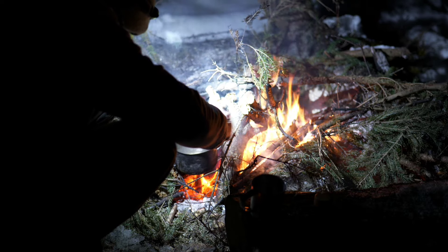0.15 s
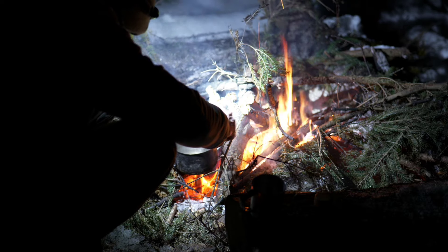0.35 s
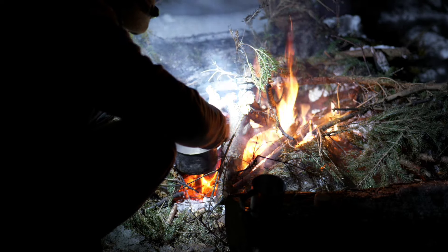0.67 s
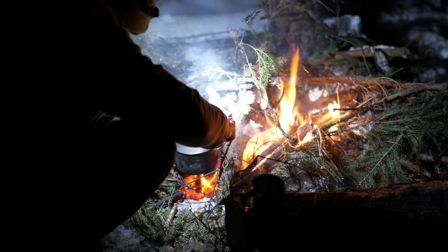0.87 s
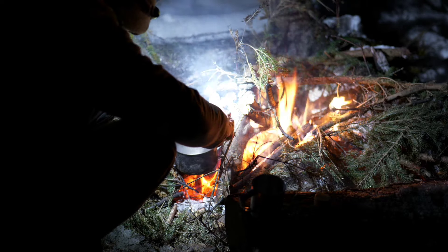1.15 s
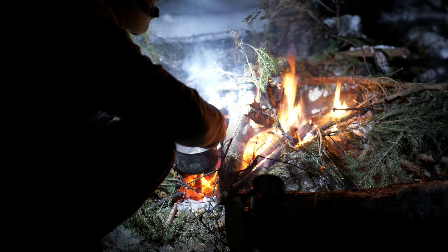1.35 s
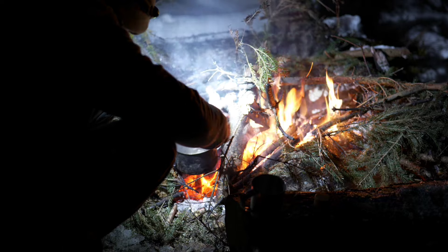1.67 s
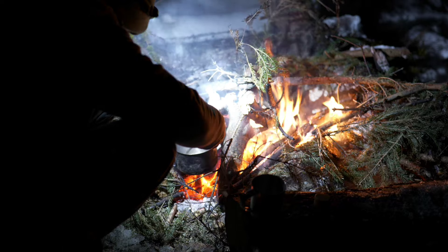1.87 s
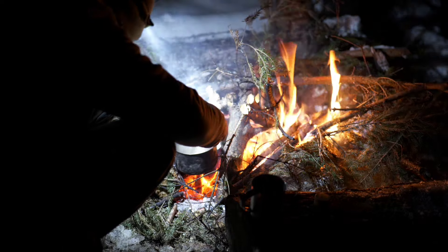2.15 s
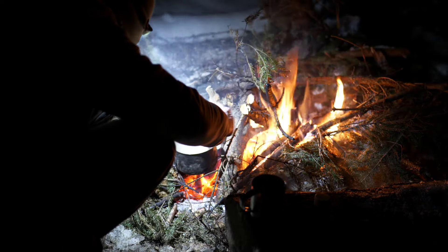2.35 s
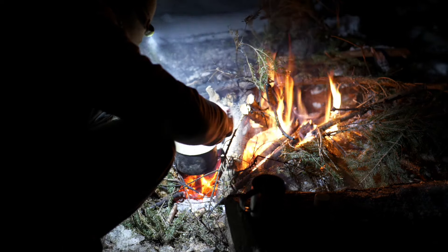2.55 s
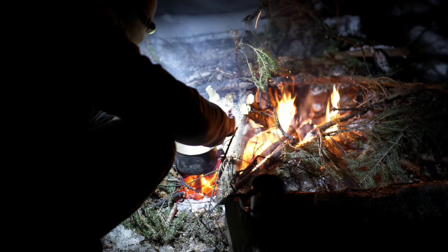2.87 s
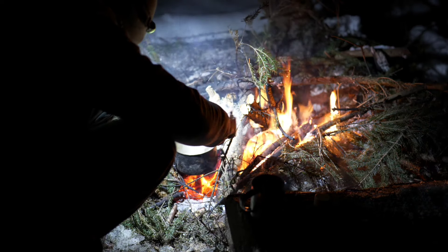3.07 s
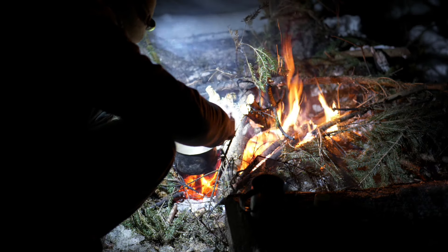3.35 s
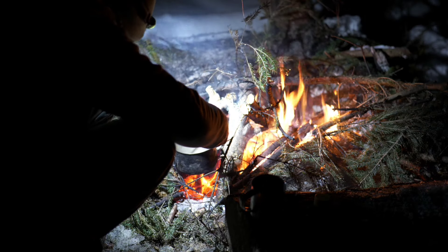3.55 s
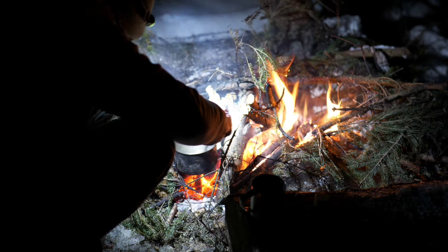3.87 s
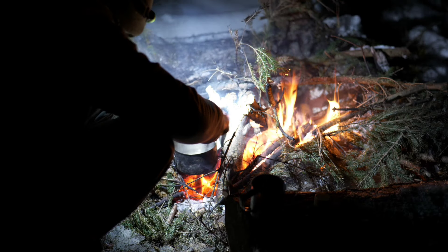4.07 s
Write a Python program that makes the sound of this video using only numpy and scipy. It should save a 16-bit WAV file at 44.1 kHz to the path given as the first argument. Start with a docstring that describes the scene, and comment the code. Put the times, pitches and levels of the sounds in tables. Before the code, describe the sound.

A small campfire of damp conifer branches, heard close on a still snowy night. Sharp snaps and tiny ticks come irregularly over soft steam hiss and a low, quiet flame flutter. Moist wood adds short bubbling plips. Pops are sparse at first, then crowd together after three seconds, where one crack stands far above the others. The space is nearly dry, with only a faint dull tail and slight microphone hiss.

```python
"""Wood pops and ticks in a small, close campfire of damp conifer branches on a still night in the snow.
Pops are filtered pressure spikes with splinters and a ground bounce; ticks are random resonated clicks.
Moisture bubbles out of the boughs in short plips: gliding, fading sines with a spatter of noise.
Steam hisses softly as coloured noise and narrow jets over the low flutter of the flames, also noise.
A faint dull tail follows pops, plips and ticks; faint steady microphone hiss lies beneath."""
import sys
import numpy as np
from scipy import signal
from scipy.fft import rfft, irfft
from scipy.io import wavfile

SR = 44100
rng = np.random.default_rng(int(sys.argv[2]) if len(sys.argv) > 2 else 0)


def waveform_to_disk(signal):
    """Save audio, clipped to [-1, 1], as 16-bit WAV at the path in sys.argv[1]."""
    frames = np.transpose(np.atleast_2d(signal))
    scaled = np.clip(frames, -1, 1) * 32767
    samples = np.round(scaled).astype(np.int16)
    wavfile.write(sys.argv[1], SR, samples)


N = 185728

# Spectrum of the flames. Each row: frequency in Hz, relative density in dB per Hz.
FLAME_SPECTRUM = [(12, -21), (20, 2.5), (33, -4.5), (102, -2), (178, -4), (202, -5.5), (251, -11.5),
                  (301, -15.5), (380, -13.5), (653, -17.5), (702, -15), (797, -10.5), (1100, -13.5),
                  (1370, -16), (1500, -14), (1950, -53), (3300, -120)]


def from_db(db):
    """Decibels to gain."""
    return 10 ** (np.asarray(db) / 20)


def rms_one(x):
    """Scale to an rms of 1."""
    return x / np.sqrt(np.mean(x ** 2) + 1e-20)


def at_hz(points, hz):
    """Read a spectrum on a log-frequency axis."""
    f, value = np.transpose(points)
    return np.interp(np.log(hz + 1e-3), np.log(f), value)


def cut(x, hz, kind, order=2):
    """Butterworth low- or high-pass."""
    sos = signal.butter(order, min(hz, SR / 2 - 1000), kind, fs=SR, output="sos")
    return signal.sosfilt(sos, x)


def resonate(x, hz, width_hz):
    """Two-pole resonance with a gain of 1 on top."""
    r = np.exp(-np.pi * width_hz / SR)
    zeros = np.array([1, 0, -1]) * (1 - r * r) / 2
    poles = [1, -2 * r * np.cos(2 * np.pi * hz / SR), r * r]
    return signal.lfilter(zeros, poles, x + 1e-18)


def drift(rate_hz):
    """Slow random drift with an rms of 1: white noise weakened above rate_hz."""
    hz = np.fft.rfftfreq(N, 1 / SR)
    white = rfft(rng.standard_normal(N))
    return rms_one(irfft(white / (1 + (hz / rate_hz) ** 2), N))


def noise(spectrum):
    """Coloured noise of rms 1."""
    hz = np.fft.rfftfreq(N, 1 / SR)
    white = rfft(rng.standard_normal(N))
    return rms_one(irfft(white * from_db(at_hz(spectrum, hz)), N))


def add(track, s, sound):
    """Mix a short sound into a track at time s."""
    i = max(0, int(round(s * SR)))
    part = sound[..., :max(0, N - i)]
    track[..., i:i + part.shape[-1]] += part


def stereo(mid, side):
    """Left and right from mid and side."""
    return np.array([mid + side, mid - side])


def scatter(t, fade_s):
    """A dying cloud of tiny reflections with unit energy."""
    onset = 1 - np.exp(-t / 0.00022)
    cloud = rng.standard_normal(len(t)) * np.exp(-t / fade_s) * onset
    return cloud / np.sqrt(np.sum(cloud ** 2))


def pop_spike(click, peak_db, sharp_hz, twig_hz):
    """A bursting pocket's pressure spike: dull if big, with a fibre snap, coloured by twig and pile."""
    # Peaks and dips from the pile of sticks. Each row: frequency in Hz, width in Hz, gain in dB.
    pile_peaks = [(180, 67, 4), (292, 113, -21), (409, 50, 3.5), (1100, 200, -0.5), (1540, 990, -4),
                  (3740, 350, -7), (4800, 370, 4.5), (6500, 6800, -8)]
    snap_db, twig_q = -19, 2.0
    bass_edge_hz, bass_share = 175, 0.082   # the sharper the pop, the higher its bass ends
    # twigs of middling size ring most
    twig_best_db, twig_best_hz, twig_db_per_octave = 8, 3320, 5.5
    twig_db = twig_best_db - twig_db_per_octave * abs(np.log2(twig_hz / twig_best_hz))

    snap = from_db(snap_db) * sharp_hz / 6000 * resonate(click, 9100, 2200)
    spike = cut(click, sharp_hz, "low") + snap
    spike = cut(spike, bass_edge_hz + bass_share * sharp_hz, "high", order=1)
    for hz, width_hz, db in [(twig_hz, twig_hz / twig_q, twig_db), *pile_peaks]:
        spike = spike + (from_db(db) - 1) * resonate(spike, hz, width_hz)
    return -from_db(peak_db) * spike / np.abs(spike).max()


def ground_bounce(click, sharp_hz):
    """A delayed, duller copy off the ground, weaker for sharper pops."""
    delay_s, strongest_db, weakest_db = 0.001353, -2, -26
    db_per_octave, knee_hz = 25, 2260   # weakens as sharpness rises above the knee
    db = strongest_db - db_per_octave * np.log2(sharp_hz / knee_hz)
    gain = from_db(np.clip(db, weakest_db, strongest_db))
    return gain * cut(np.roll(click, int(delay_s * SR)), 8400, "low")


def pops():
    """Steam pockets burst: each spike is convolved with itself direct, its bounce and its splinters."""
    # Bursts in the wood. Each row: start in seconds, spike peak in dB, sharpness in Hz,
    # twig resonance in Hz, splintering in dB relative to the spike.
    bursts = [ (0.088, -41, 6500, 4600, 3), (0.1379, -28, 3670, 720, -27), (0.6479, -20, 10100, 3400, -8),
              (1.0526, -15.5, 5700, 3740, -8), (1.3994, -38, 880, 400, -21),
              (1.4055, -26, 2920, 2140, -6.5), (1.4227, -37, 3800, 3400, -9),
              (1.8499, -36.5, 11000, 4800, -20), (2.0776, -14.5, 13800, 11500, -10.5),
              (2.1344, -33, 11000, 3960, -16), (2.5089, -28.5, 2870, 750, -11),
              (2.6486, -34, 11500, 4400, -5), (2.7770, -11.5, 12600, 3600, -10),
              (2.901, -28, 11500, 3970, -5), (3.0951, -22.5, 13100, 3300, -2),
              (3.1101, -19, 12400, 3670, 3), (3.2447, -24.5, 14100, 9000, -2.5),
              (3.2666, -3.5, 4840, 1900, -8.5), (3.3516, -21, 2400, 4340, -5.5),
              (3.5010, -21.5, 11800, 8800, -4), (3.5107, -29.5, 12800, 10000, -5),
              (3.6445, -36.5, 4530, 3000, -3), (3.7441, -27.5, 13300, 3200, 2),
              (3.81, -26.5, 10000, 4800, -11), (3.8331, -20, 7850, 3140, -5.5), ]
    splinter_s, splinter_low_hz, side_db = 0.0021, 600, -20
    out, t = np.zeros((2, N)), np.arange(SR // 40) / SR
    click = 1.0 * (t == 0)
    for s, peak_db, sharp_hz, twig_hz, splinter_db in bursts:
        spike = pop_spike(click, peak_db, sharp_hz, twig_hz)
        splinters = from_db(splinter_db) * cut(scatter(t, splinter_s), splinter_low_hz, "high")
        mid = click + ground_bounce(click, sharp_hz) + splinters
        side = from_db(side_db) * cut(scatter(t, splinter_s), 13500, "high", order=1)
        add(out, s, signal.fftconvolve(stereo(mid, side), spike[None], axes=1))
    return out


def sizzle():
    """Needles and bark tick at random, most of them barely above the steam."""
    ticks_per_s, least_db, spread_db = 60, -53, 2.2   # click levels ahead of the resonances
    sizes = from_db(least_db + spread_db * np.minimum(rng.exponential(1, N), 3))
    clicks = sizes * (rng.random(N) < ticks_per_s / SR)
    woody_ticks = 2 * resonate(clicks, 2700, 1450)
    thin_snaps = resonate(clicks, 11000, 5000)
    t = np.arange(SR // 100) / SR
    smear = (t == 0) + scatter(t, 0.0022)
    return signal.fftconvolve(woody_ticks + thin_snaps, smear)[:N]


def bubble(tone_db, hz, fade_s, glide):
    """A bubble swells, rings while its pitch slides, spatters as it opens and stirs the hollows."""
    # Hollows between the logs. Each row: frequency in Hz, width in Hz, gain in dB.
    hollow_modes = [(750, 70, -13.5), (1920, 160, -15.5)]
    swell_share, longest_swell_s = 0.43, 0.0029   # share of the fade time, up to a limit
    # spatter and gurgle grow more slowly than the tone; their levels hold at middling_db
    middling_db, burst_follows = -37, 0.47
    spatter_db, spatter_width_hz, spatter_top_hz = -55.5, 920, 3400   # rms ahead of the envelope
    gurgle_db, gurgle_fade_s = -49.5, 0.025   # ahead of each hollow's gain

    t = np.arange(SR // 8) / SR
    swell_s = min(swell_share * fade_s, longest_swell_s)
    swell = np.sin(np.pi / 2 * np.minimum(t / swell_s, 1)) ** 2
    envelope = swell * np.exp(-np.maximum(t - swell_s, 0) / fade_s)
    pitch_hz = hz * 2 ** np.clip(glide * t, -1, 1)
    tone = from_db(tone_db) * np.sin(2 * np.pi * np.cumsum(pitch_hz) / SR)

    burst = from_db(burst_follows * (tone_db - middling_db))
    white = rng.standard_normal(len(t))
    spatter = resonate(white, min(1.34 * hz, 4200), spatter_width_hz)
    spatter = from_db(spatter_db) * rms_one(cut(spatter, spatter_top_hz, "low"))
    gurgle = sum(from_db(gurgle_db + db) * rms_one(resonate(white, f, width_hz))
                 for f, width_hz, db in hollow_modes)
    gurgle_envelope = swell * np.exp(-t / gurgle_fade_s)
    return envelope * (tone + burst * spatter) + gurgle_envelope * burst * gurgle


def bubbling():
    """Clear plips of the wet boughs among faint random ones, most of them low and rising."""
    # Bubbles. Each row: start in seconds, tone level in dB ahead of its envelope, starting pitch in Hz,
    # fade time in seconds, glide in octaves per second.
    clear_plips = [ (0.350, -51, 1920, 0.0042, -5), (0.463, -46, 1130, 0.0034, 12),
                   (0.464, -51, 1950, .0033, 8), (0.592, -40.5, 1100, 0.0027, 13),
                   (0.600, -48, 1250, .005, 42), (0.851, -52, 990, 0.0044, 2), (0.912, -52, 745, .0057, 11),
                   (1.1465, -38.5, 1280, 0.0012, 10), (1.148, -51, 778, 0.031, -1),
                   (1.154, -49.5, 4510, 0.0041, 2), (1.1555, -34, 3000, 0.0024, 4),
                   (1.161, -44, 3230, 0.004, -5), (1.158, -51, 1964, .012, 6.5),
                   (1.653, -46, 4450, 0.0024, -4), (1.654, -47, 3170, .0065, 3), (1.655, -56, 753, .014, 1),
                   (1.986, -49.5, 750, 0.02, 1), (2.020, -38.5, 1245, 0.0021, 6),
                   (2.021, -42, 850, 0.0043, 3), (2.031, -43, 833, 0.0064, 1),
                   (2.046, -43, 877, 0.0055, 17), (2.218, -45, 3350, 0.0076, -1.5),
                   (2.259, -47.5, 4620, 0.0043, 7), (2.524, -55, 1875, .012, 0),
                   (2.549, -50.5, 904, 0.008, 0), (2.820, -44, 882, 0.0055, 5),
                   (2.890, -45, 980, 0.0024, 7), (2.905, -54, 1150, .0036, 20),
                   (3.0806, -33.5, 800, 0.0047, 23), (3.189, -53, 1810, .005, 5),
                   (3.459, -54, 432, 0.0057, 1), (3.528, -55, 843, 0.033, -5), (3.575, -50, 1790, .005, -1),
                   (3.6438, -30, 880, 0.005, -7), (3.650, -51, 678, .022, 1), (3.657, -43, 876, 0.0071, 45),
                   (3.816, -46.5, 954, 0.0054, 25), (4.024, -62, 850, 0.0033, -21), ]
    faint_count, faintest_db = 16, -63
    out = np.zeros(N)
    for s, *shape in clear_plips:
        add(out, s, bubble(*shape))
    for when, size, pitch, rise in rng.random((faint_count, 4)):
        hz = 700 * 3 ** (pitch ** 2)
        add(out, when * N / SR, bubble(faintest_db + 4 * size, hz, 0.013, 20 * rise))
    return out


def clearing(x):
    """Snow swallows nearly everything; trunks return a faint, dull tail."""
    wet_db, fade_s, top_hz = -29, 0.034, 5000
    t = np.arange(SR // 4) / SR
    tail = cut(stereo(scatter(t, fade_s), 0.14 * scatter(t, fade_s)), top_hz, "low")
    return x + from_db(wet_db) * signal.fftconvolve(x, tail, axes=1)[:, :N]


def steam(t):
    """Escaping steam: broad hiss plus narrow jets, flickering and slowly gaining strength."""
    # Spectrum of the hiss. Each row: frequency in Hz, relative density in dB per Hz.
    hiss_spectrum = [(880, -34), (1500, -22), (1720, -4.5), (1880, -4), (2130, -5.5), (2720, -2.5),
                     (3310, -2), (4140, -5.5), (4940, -4), (5830, -13), (6890, -15.5), (9230, -8.5),
                     (11400, -10.5), (14500, -13), (15500, -18)]
    # Narrow jets. Each row: frequency in Hz, width in Hz, rms in dB ahead of the flicker and rise.
    jet_bands = [(3294, 260, -67.5), (4430, 190, -72)]
    hiss_db, rise_db_per_s, flicker_db, flicker_hz = -60, 0.35, 0.5, 29
    jets = sum(from_db(db) * rms_one(resonate(rng.standard_normal(N), hz, width_hz))
               for hz, width_hz, db in jet_bands)
    level_db = rise_db_per_s * (t - t.mean()) + flicker_db * drift(flicker_hz)
    return from_db(level_db) * (from_db(hiss_db) * noise(hiss_spectrum) + jets)


def flames(t):
    """Low turbulent flutter: coloured noise with a drifting level that slowly gains strength."""
    mid_db, rise_db_per_s, flicker_db, flicker_hz = -62.5, 0.32, 2.67, 7.3
    level_db = mid_db + rise_db_per_s * (t - t.mean()) + flicker_db * drift(flicker_hz)
    return from_db(level_db) * cut(noise(FLAME_SPECTRUM), 30, "high", order=1)


def flare(t):
    """One tongue of flame swells and sinks with a deep flutter."""
    middle_s, half_length_s, peak_rms_db, top_hz = 1.4, 0.7, -67, 110
    swell = np.exp(-((t - middle_s) / half_length_s) ** 2)
    return from_db(peak_rms_db) * swell * rms_one(cut(noise(FLAME_SPECTRUM), top_hz, "low"))


def mic_hiss():
    """Faint steady microphone hiss, opposite in the two channels: coloured noise for the side signal."""
    # Spectrum of the microphone hiss. Each row: frequency in Hz, relative density in dB per Hz.
    mic_hiss_spectrum = [(30, -2), (130, -4), (300, -7), (900, -6), (1600, -9), (7000, -9), (10000, -6.5),
                         (15000, -9.5)]
    return from_db(-69.5) * noise(mic_hiss_spectrum)


def scene():
    """Pops, plips and ticks over the bed of flame and steam."""
    t = np.arange(N) / SR
    events = clearing(pops() + bubbling() + sizzle())
    bed = flames(t) + flare(t) + steam(t)
    return events + stereo(bed, mic_hiss())


def record(dry):
    """Steep elliptic low-pass at 15.8 kHz."""
    sos = signal.ellip(10, 0.1, 70, 15800, fs=SR, output="sos")
    return signal.sosfilt(sos, dry)


dry = scene()
out = record(dry)
waveform_to_disk(out)
```